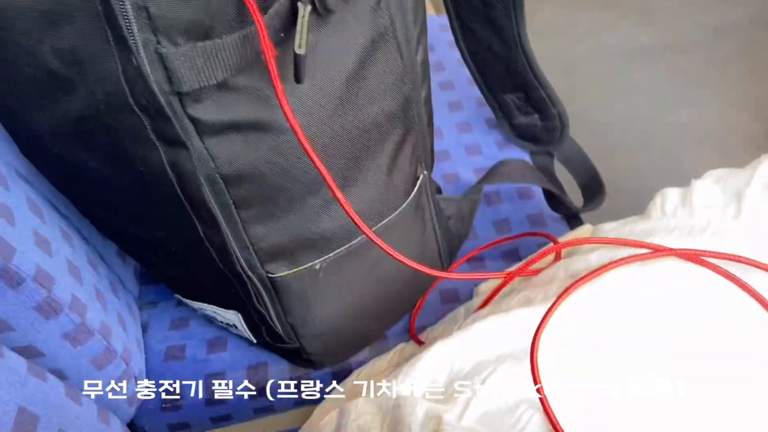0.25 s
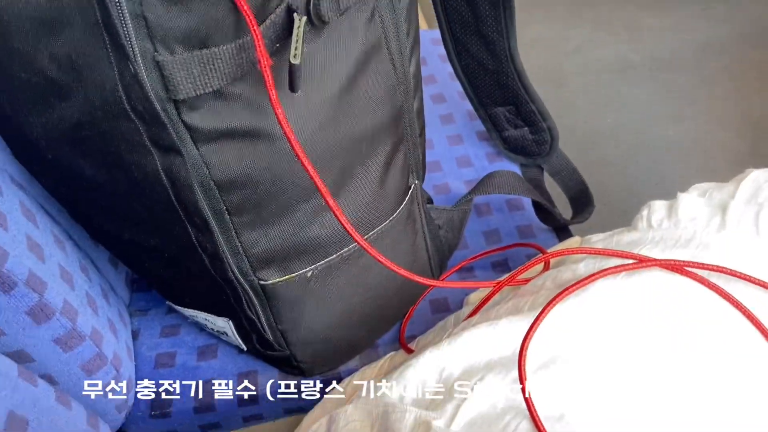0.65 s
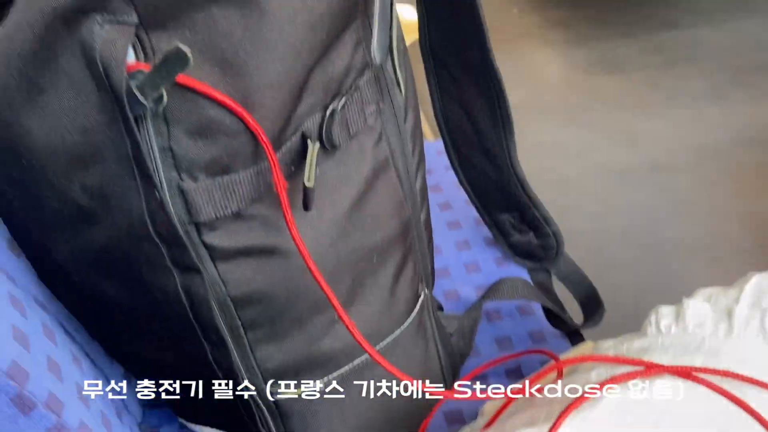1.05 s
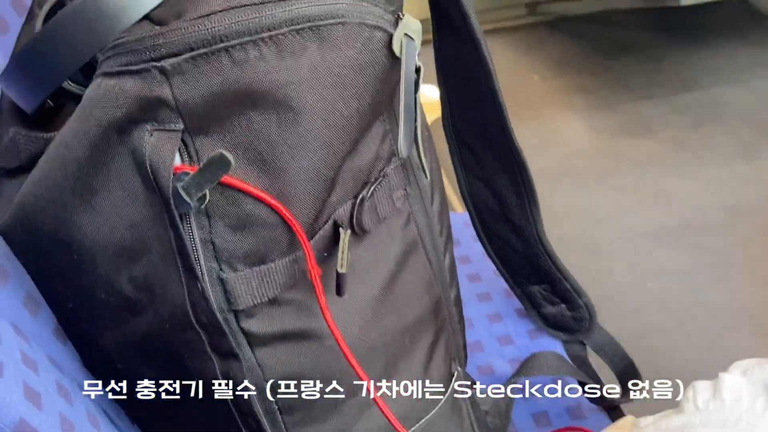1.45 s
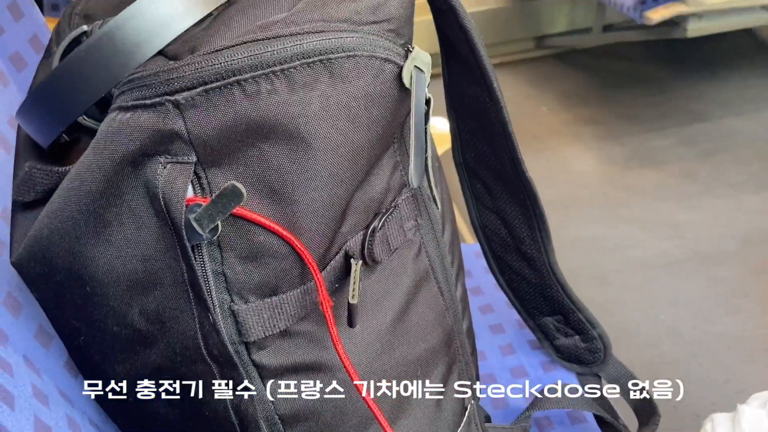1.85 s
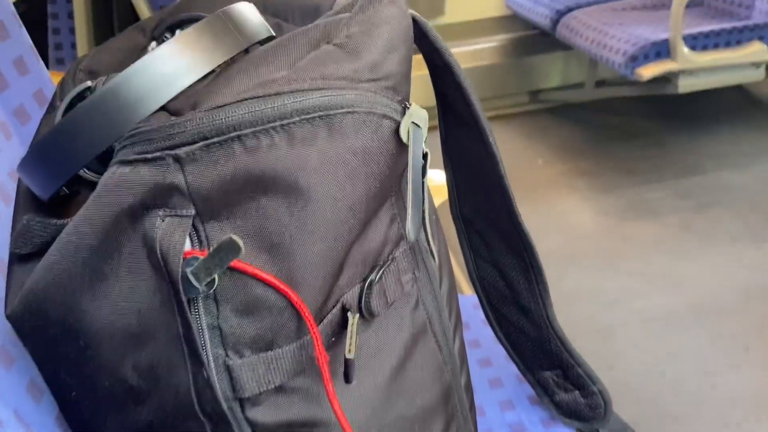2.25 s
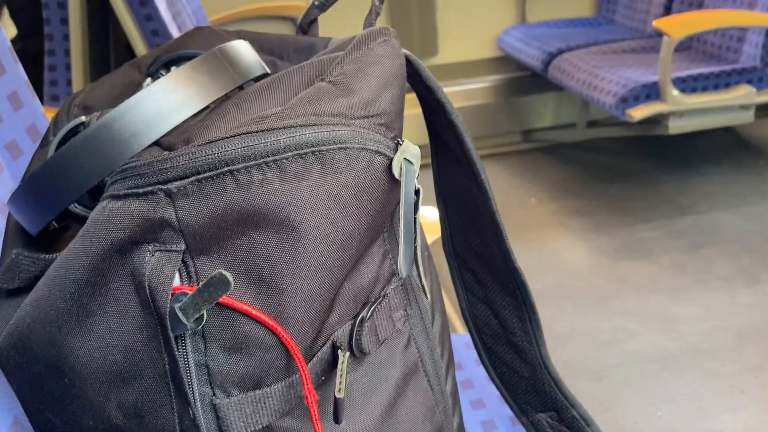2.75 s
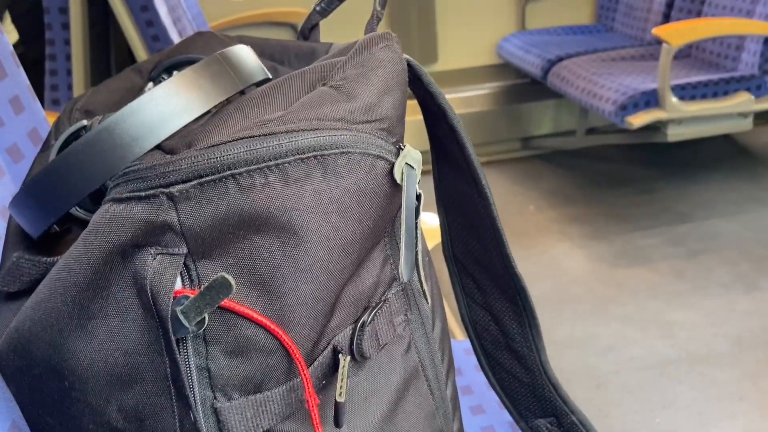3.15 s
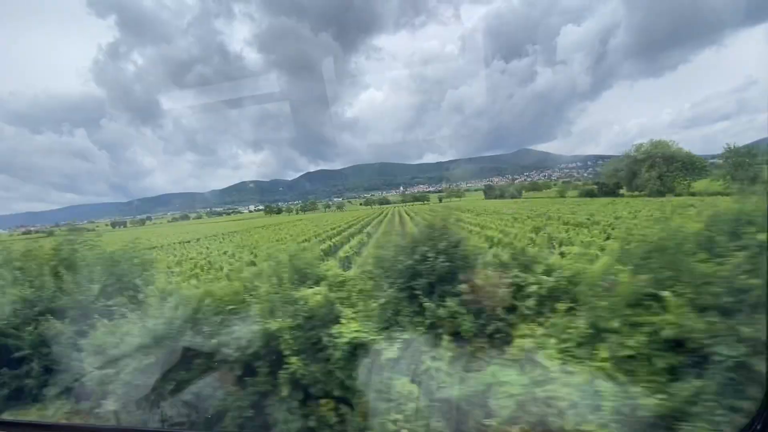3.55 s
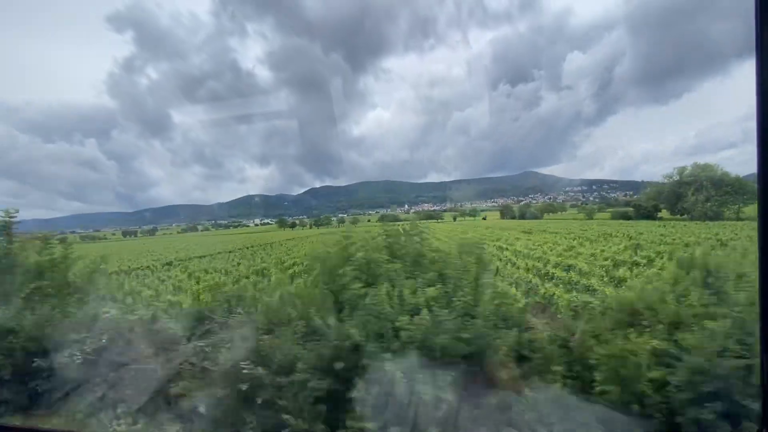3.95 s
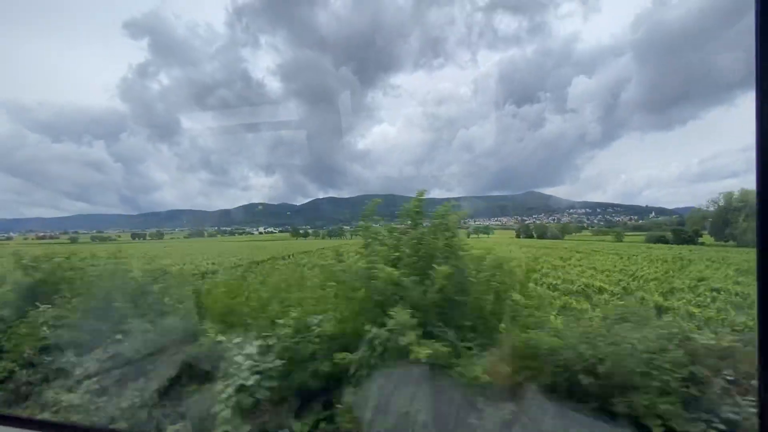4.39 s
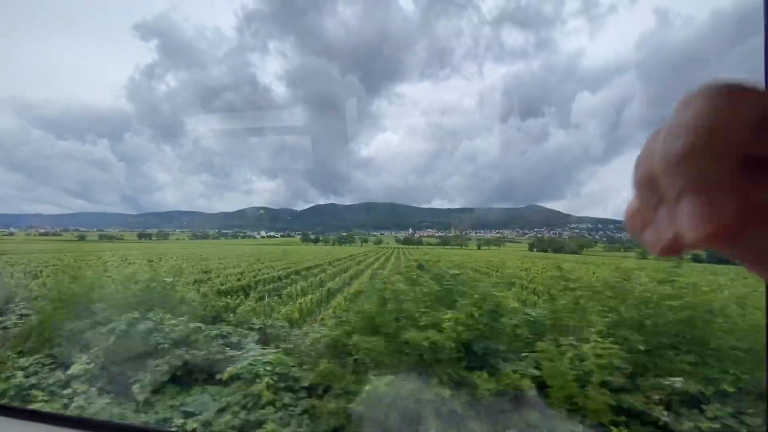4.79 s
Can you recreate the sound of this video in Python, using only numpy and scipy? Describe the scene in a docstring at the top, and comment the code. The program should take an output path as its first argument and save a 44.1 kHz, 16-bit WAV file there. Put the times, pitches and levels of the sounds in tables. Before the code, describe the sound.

Inside a diesel train carriage, the engine throbs at idle under the floor while a fan hums and the wheels roll with a low rumble. Soft knocks and swishes come as the wheels cross rough spots, followed by faint squeaks. About two thirds through, a click marks an abrupt change to a louder, pulsing engine boom with slightly rising gear tones and heavier rolling noise. The microphone is in the passenger cabin.

```python
"""A diesel engine throbs at idle under the floor of a coasting railcar, three firings to each turn.
A fan hums, and broadband rolling noise swells as the wheels cross rough spots, with soft knocks,
swishes and faint squeaks. A click marks an abrupt jump to a window seat with the engine pulling:
a strong firing boom that beats with nearby tones, gear tones rising with speed, louder rolling noise."""
import sys
import numpy as np
from scipy import signal
from scipy.fft import rfft, irfft, next_fast_len
from scipy.io import wavfile
from scipy.ndimage import uniform_filter1d, map_coordinates

SR = 44100
rng = np.random.default_rng(int(sys.argv[2]) if len(sys.argv) > 2 else 0)


def wrap_up_sound(samples):
    """Save the sound to the file named by the first command line argument, as 16-bit audio."""
    columns = np.atleast_2d(samples).T
    # keep every value between -1 and 1, then stretch to whole-number steps
    tamed = np.clip(columns, -1, 1)
    steps = np.round(tamed * 32767).astype(np.int16)
    wavfile.write(sys.argv[1], SR, steps)


N = 221602
T = np.arange(N) / SR
JUMP_S, FIRINGS_PER_TURN = 3.53717, 3


def amp(db):
    """The decibel law: 20 dB is a factor of ten in amplitude."""
    return 10 ** (np.asarray(db) / 20)


def along(points, hz):
    """Interpolation of (Hz, value) points on a logarithmic frequency axis."""
    f, v = np.transpose(points)
    return np.interp(np.log(hz + 1), np.log(f + 1), v)


def curves(rows):
    """Linear interpolation in time: one value per sample for each column after the first."""
    s, *cols = np.transpose(rows)
    return [np.interp(T, s, c) for c in cols]


def wobble(rate):
    """Smooth random modulation: a spline through rate knots a second."""
    return map_coordinates(rng.standard_normal(int(N * rate / SR) + 4), [T * rate])


def swell(s, rise, fall):
    """A Gaussian envelope that peaks at time s, with separate rise and fall times."""
    return np.exp(-np.where(T < s, ((s - T) / rise) ** 2, ((T - s) / fall) ** 2))


def filtered(x, response):
    """Linear filtering: the spectrum of x is multiplied by a frequency response."""
    m = next_fast_len(N + SR // 2)
    return irfft(rfft(x, m) * response(np.fft.rfftfreq(m, 1 / SR)), m)[..., :N]


def tone(cycles, mid_db, side_db):
    """A wave reaches one channel first, so the side (difference) lags the mid (sum) a quarter cycle."""
    mid = amp(mid_db) * np.cos(2 * np.pi * cycles)
    side = amp(side_db) * np.sin(2 * np.pi * cycles)
    return np.sqrt(2) * np.array([mid + side, mid - side])


def orders(turns, table, waver_db, locked):
    """Superposed multiples of a shaft's speed; phase-locked ones add up to one pulse per firing."""
    return sum(amp(waver_db * wobble(2.99)) * tone(k * turns + (0 if locked else rng.random()), mid, side)
               for k, mid, side in table)


def idling_engine(turns):
    """Periodic firing gives a harmonic series; uneven firing adds tones between the harmonics."""
    # Each row: time in seconds, mid level of the firing fundamental in dB.
    throb_levels = [(0, -28), (1.2, -29.5), (1.6, -34), (2.4, -35), (3.6, -35)]
    # Each row: multiple of crank speed, mid level in dB, side level in dB.
    firing_orders = [(6, -33.5, -75), (9, -42, -75), (12, -47, -75), (18, -46, -62)]
    knock_orders = [(24, -63, -69), (27, -58, -59), (30, -60, -64), (33, -56.5, -56), (36, -68, -57),
                    (39, -63.5, -60), (42, -57, -63), (45, -62, -66), (48, -73, -62), (51, -61.5, -61)]
    uneven_orders = [(4.5, -41, -80), (5, -37.5, -80), (7, -48, -80), (8, -39, -72), (14, -48, -78)]
    throb_db, = curves(throb_levels)
    throb = tone(FIRINGS_PER_TURN * turns - 1 / 3, throb_db, throb_db - 45)  # trails the push
    push = orders(turns, firing_orders, waver_db=1.5, locked=True)
    knock = orders(turns, knock_orders, waver_db=2.5, locked=True)
    uneven = orders(turns, uneven_orders, waver_db=3.0, locked=False)
    return throb + push - knock + uneven  # the diesel knock pulls where the low harmonics push


def fan():
    """A fan hums at one frequency; its phase is the integral of that slowly drifting frequency."""
    # Each row: time in seconds, frequency in Hz, mid level in dB.
    hum = [(0, 212.4, -39.5), (1.8, 212.4, -38.5), (2.2, 213, -37.5), (3.6, 212.9, -37.5)]
    hz, db = curves(hum)
    return tone(np.cumsum(hz) / SR, db, db - 19.5)


def cabin_noise(mids, sides, width_db, late, lean, levels, patchy_db):
    """Partly coherent noise shaped in four registers: rolling rumble, floor drone, rail roar, high hiss."""
    out = 0
    for mid, side, side_db, share, level_db in zip(mids, sides, width_db, late, levels):
        z = signal.stft(rng.standard_normal((2, N)), nperseg=2048)[2]
        # A share of the side signal is the mid signal arriving a quarter cycle late.
        z[1] = np.sqrt(1 - share ** 2) * z[1] - 1j * share * z[0]
        patches = rng.standard_normal(z.shape[1:])  # level varies over frequency and time
        patches = uniform_filter1d(uniform_filter1d(patches, 4, 0), 4, 1)
        pair = signal.istft(z * amp(patchy_db * patches / patches.std()), nperseg=2048)[1][:, :N]
        pair = filtered(pair, lambda hz: amp([along(mid, hz), along(side, hz)]))
        out = out + amp(level_db) * amp([[0], [side_db]]) * pair / pair.std(axis=1, keepdims=True)
    stereo = np.array([out[0] + out[1], out[0] - out[1]])
    return filtered(stereo, lambda hz: amp([along(lean, hz) / 2, -along(lean, hz) / 2]))


def coasting_noise(turns):
    """Amplitude modulation of the noise: each firing rattles the upper registers, and jolts lift it."""
    # Each row: frequency in Hz, relative spectral level in dB; sides holds one such table per register.
    rumble = [(16, -26), (30, -9), (44, -7), (55, -3), (70, -2), (85, -5), (110, -4), (135, -11),
              (185, -10), (205, -14), (230, -15), (260, -19), (340, -45), (570, -120)]
    drone = [(150, -30.5), (260, -4), (285, 1.5), (431, -6.5), (484, -11), (700, -12), (745, -24.5),
             (980, -54), (1650, -120)]
    roar = [(440, -26), (750, -1.5), (892, -2.5), (1050, -4.5), (1430, -3), (1630, -6), (2030, -5.5),
            (2230, -10), (2540, -9.5), (3300, -16.5), (4290, -45), (7260, -120)]
    # High hiss with narrow gaps near 7.2 kHz (mid) and 10.5 kHz (last side table), as in compressed audio.
    gapped_hiss = [(1940, -37), (3300, -5), (3800, -0.5), (4590, -2), (6230, -12.5), (6960, -24.5),
                   (7240, -54), (8130, -19), (9200, -13), (11800, -15), (13600, -44), (14600, -24),
                   (15600, -32)]
    sides = [
        [(16, -44), (28, -18), (177, -9), (206, 5), (260, -4), (340, -31), (570, -120)],
        [(150, -34.5), (260, -7), (471, -1), (750, -10), (980, -34.5), (1650, -120)],
        [(440, -26), (750, 2.5), (887, -6), (1020, -5.5), (1490, -7), (3300, -15.5), (4290, -44), (7260, -120)],
        [(1940, -29.5), (3300, 0.5), (4650, -3.5), (8730, -12.5), (9820, -24), (10500, -45), (10700, -26),
         (11500, -18), (14100, -15), (15600, -32)],
    ]
    # Each row: frequency in Hz, left minus right level in dB.
    lean = [(100, 0), (200, 1), (380, 3.5), (700, 1), (2400, 0)]
    # The noise brightens and stays so. Each row: time in seconds, lift of the hiss in dB.
    brightening = [(0, 1.5), (.9, -0.5), (1.3, 3.5), (1.65, 6.5), (1.9, 7), (2.25, 8.5), (2.6, 6.5),
                   (3.1, 5.5), (3.5, 6.5)]
    steady_db = np.c_[[-31, -44.5, -56.5, -69]] + np.outer([0.28, 0.02, 0.44, 1], curves(brightening)[0])
    rattle_db = np.outer([0, 1.3, .7, .6], np.cos(2 * np.pi * FIRINGS_PER_TURN * turns))
    drift_db = 0.27 * np.array([wobble(4.2) for _ in range(4)])
    levels = steady_db + rustles() + jolts() + rattle_db + drift_db
    return cabin_noise((rumble, drone, roar, gapped_hiss), sides, width_db=(-33, -1.5, 7, 0.5),
                       late=(0.37, 0.34, .4, .55), lean=lean, levels=levels, patchy_db=2.5)


def rustles():
    """Soft friction, as of cloth, is mostly hiss: a lift in dB for each register."""
    # Each row: peak time in seconds, lift of the hiss in dB.
    rubs = [(.24, 1), (.95, 4), (1.09, 1.5), (1.5, 4.5), (3.2, 2), (3.4, 2)]
    return np.outer([0.1, 0, 0.038, 0.93], sum(db * swell(s, rise=0.036, fall=0.14) for s, db in rubs))


def jolts():
    """Rough spots excite the wheels briefly over a broad band: a lift in dB for each register."""
    # Each row: peak time in seconds, fall time in seconds, lift of the hiss in dB.
    rough_spots = [(1.045, 0.075, 7), (1.543, 0.06, 5.5), (2.04, 0.038, 1), (2.72, 0.041, 3.5)]
    return np.outer([0.49, 0.72, 0.8, 1], sum(db * swell(s, 0.0077, fall) for s, fall, db in rough_spots))


def swishes():
    """Noise bursts each excite one resonance, mostly on the two strongest jolts."""
    # Each row: peak time, rise and fall in seconds, centre and half-width in Hz, level in dB.
    bursts = [(1.065, 0.026, 0.02, 550, 150, -44), (1.05, .012, 0.027, 1670, 340, -52),
              (1.085, 0.015, 0.033, 250, 64, -40.5), (1.065, .015, .025, 930, 100, -51),
              (1.541, .002, .04, 4470, 450, -49), (1.548, .004, .025, 5500, 760, -54),
              (1.577, 0.036, 0.096, 4670, 1000, -55), (1.546, .004, .055, 10300, 1200, -58.5),
              (1.565, 0.013, .02, 200, 45, -27.5), (1.548, .008, 0.032, 600, 220, -45),
              (1.548, 0.0055, 0.029, 1820, 220, -50), (1.545, .005, .035, 1050, 140, -48),
              (1.598, 0.0095, 0.016, 200, 59, -28.5), (1.602, .008, 0.012, 620, 180, -46),
              (1.603, .01, .015, 1340, 510, -51), (1.632, .012, 0.013, 800, 390, -50.5),
              (3.8, .012, 0.026, 570, 45, -46), (3.195, .015, .03, 10500, 1600, -72),
              (3.36, .04, .06, 4300, 710, -66)]
    out = 0
    for s, rise, fall, hz, half_width, db in bursts:
        band = signal.butter(3, [hz - half_width, hz + half_width], "band", fs=SR, output="sos")
        mid, side = signal.sosfilt(band, rng.standard_normal((2, N)))
        stereo = np.array([mid + 0.44 * side, mid - 0.28 * side]) / mid.std()
        out = out + amp(db) * swell(s, rise, fall) * stereo
    return out


def thuds(rise_s=.001):
    """Damped oscillation: knocks inside the two strongest jolts die within a few cycles."""
    # Each row: start in seconds, frequency in Hz, decay time in seconds, level in dB.
    knocks = [(1.046, 330, .008, -27), (1.069, 260, .01, -24), (1.086, 150, .012, -21),
              (1.539, 110, .008, -19), (1.5902, 80, .014, -12), (1.598, 600, .008, -31)]
    out = 0
    for s, hz, decay, db in knocks:
        t = np.clip(T - s, 0, None)
        envelope = np.exp(-t / decay) * (1 - np.exp(-t / rise_s))
        out = out + amp(db) * envelope * np.sin(2 * np.pi * hz * t)
    return out


def squeaks():
    """Linear chirps: faint tones glide in pitch and waver in level while they swell and fade."""
    # Each row: peak time, rise and fall in seconds, frequency in Hz, glide in Hz per second, level in dB.
    chirps = [(2.045, .025, .075, 1440, 100, -59), (2.135, .02, .03, 1550, 100, -59),
              (2.163, .02, .025, 1220, 200, -58), (3.25, .05, .06, 3580, 400, -73),
              (3.385, .03, .03, 3520, -900, -69), (3.44, .02, .03, 3510, 600, -70),
              (3.51, .05, .05, 3580, 500, -70.5)]
    waver = .95 + .3 * np.array([wobble(40), wobble(41)])
    return waver * sum(swell(s, rise, fall) * tone(hz * (T - s) + glide * (T - s) ** 2 / 2, db, -120)
                       for s, rise, fall, hz, glide, db in chirps)


def coasting():
    """Superposition of the sources in the coasting car; the idling crank times throb and rattle."""
    # Each row: time in seconds, crank speed in turns per second.
    crank_speed = [(0, 13.345), (1.9, 13.339), (2.2, 13.36), (3.6, 13.362)]
    turns = -.088 + np.cumsum(curves(crank_speed)[0]) / SR
    return idling_engine(turns) + fan() + coasting_noise(turns) + swishes() + thuds() + squeaks()


def click(length_s=.003):
    """A sudden step has a broad spectrum and is heard as a click, here stronger on the right."""
    step = (T >= JUMP_S) * np.clip(1 - (T - JUMP_S) / length_s, 0, 1)
    return np.outer([.08, .14], step)


def firing_boom(turns, lean_db=-0.8):
    """Beating: weaker tones beside the loaded firing tone make it dip about once an engine cycle."""
    # The deepest dips. Each row: time in seconds, gain of the firing tone in dB.
    dips = [(3.636, -9), (3.825, -6), (3.922, -4.5), (4.092, -4), (4.3, -4), (4.449, -6.5), (4.618, -6),
            (4.805, -9), (4.864, -10.5)]
    # Each row: multiple of crank speed, phase lead in cycles, mid level in dB, side level in dB.
    beat_tones = [(2, -.17, -34.5, -62), (2.5, -.36, -30.5, -51.5), (2.585, -.42, -29.5, -54),
                  (4, -.1, -38, -60)]
    dip_db = sum(db * swell(s, rise=0.01, fall=0.01) for s, db in dips)
    boom = amp(dip_db) * tone(FIRINGS_PER_TURN * turns, mid_db=-14.5, side_db=-42)
    neighbours = sum(amp(.7 * wobble(2.2)) * tone(k * turns + lead, mid, side)
                     for k, lead, mid, side in beat_tones)
    return (boom + neighbours) * amp([[lean_db / 2], [-lean_db / 2]])


def shaft_tones(turns, table, waver_db, jitter_cycles):
    """Modulated shaft orders: each swells or fades steadily and wanders in level and phase."""
    return sum(amp(growth * (T - 4.0) + waver_db * wobble(16))
               * tone(k * turns + rng.random() + jitter_cycles * wobble(12), mid, side)
               for k, mid, side, growth in table)


def engine_and_gears(turns):
    """Fixed gear ratios make the tones of two shafts rise in pitch with those of the loaded engine."""
    # Each row: multiple of shaft speed, mid and side levels in dB at 4 s, growth in dB per second.
    engine_orders = [(5.89, -43, -39.5, -2.5), (21.46, -65.5, -66, -0.5), (30.2, -59, -58.5, -10)]
    drive_orders = [(2, -38, -57, -1.5), (4, -36.5, -48.5, -1.5), (5, -39.5, -45.5, 5),
                    (6, -51, -46.5, -1.5), (7, -50.5, -63.5, 4.5), (8, -43.5, -62, -2.5)]
    pump_orders = [(2, -45.5, -55.5, 3.5), (3, -46, -46, 5.5), (6, -50, -52, 5.5), (8, -59, -53.5, -4.5)]
    # Each row: multiple of crank speed, mid level in dB, side level in dB.
    uneven_orders = [(4.5, -35.5, -56), (7, -44, -51), (16.5, -62, -52), (20, -66, -58), (22, -67, -57)]
    drive_ratio, pump_ratio = 1.783, 3.058
    engine = shaft_tones(turns, engine_orders, waver_db=2.3, jitter_cycles=0.02)
    uneven = orders(turns, uneven_orders, waver_db=1.0, locked=False)
    drive = shaft_tones(drive_ratio * turns, drive_orders, waver_db=3.0, jitter_cycles=0.07)
    pump = shaft_tones(pump_ratio * turns, pump_orders, waver_db=3.2, jitter_cycles=.1)
    return engine + uneven + drive + pump


def pulling_noise():
    """Rolling noise grows with speed: each register rises steadily in level."""
    # Each row: frequency in Hz, relative spectral level in dB; sides holds one such table per register.
    rumble = [(16, -28), (32, -4), (43, -12), (62, 1), (100, -3.5), (150, -7), (210, -13), (260, -16),
              (340, -45), (570, -120)]
    drone = [(150, -27.5), (260, -6), (290, -2), (377, -2), (497, -7.5), (557, -14), (750, -15.5),
             (980, -47.5), (1650, -120)]
    roar = [(440, -27), (750, 1), (818, -3.5), (881, -5), (1500, -9.5), (2030, -15.5), (2810, -17),
            (3300, -22.5), (4290, -51.5), (7260, -120)]
    hiss = [(1940, -29), (3300, -5.5), (3930, -3.5), (8460, -12), (9560, -13.5), (10600, -9.5),
            (12400, -20), (13100, -45), (14200, -25.5), (15600, -33)]
    sides = [
        [(16, -40), (28, -9.5), (70, 3), (119, -2.5), (168, -2), (260, -5), (340, -34.5), (570, -120)],
        [(150, -29), (260, 0.5), (335, -3.5), (750, -11.5), (980, -39.5), (1650, -120)],
        [(440, -31.5), (750, -5), (818, -8), (887, -13.5), (1530, -18.5), (3300, -29.5), (4290, -63.5),
         (7260, -120)],
        [(1940, -36), (3300, -1), (4650, -3), (10100, -10), (11500, -23.5), (12500, -17.5), (14000, -18.5),
         (15600, -46)],
    ]
    # Each row: frequency in Hz, left minus right level in dB.
    lean = [(60, -.5), (110, -.5), (200, -4), (380, -1.5), (700, 2), (4400, 3.5), (8100, 1), (15000, 0)]
    rise_db = np.outer([0.066, 1, .4, .9], T - 4.3)
    drift_db = 0.41 * np.array([wobble(5.4) for _ in range(4)])
    levels = np.c_[[-27, -39, -49, -65]] + rise_db + drift_db
    return cabin_noise((rumble, drone, roar, hiss), sides, width_db=(-17, -0.5, 2, -0.5),
                       late=(0.44, 0.51, .4, .4), lean=lean, levels=levels, patchy_db=1.93)


def pulling():
    """Superposition of the sources under load, with the crank at about twice its idling speed."""
    # Each row: time in seconds, crank speed in turns per second.
    crank_speed = [(3.537, 26.496), (5.03, 27.1)]
    turns = np.cumsum(curves(crank_speed)[0]) / SR
    turns = -.058 + turns - turns[round(JUMP_S * SR)]  # crank angle counted from the jump
    return firing_boom(turns) + engine_and_gears(turns) + pulling_noise()


def scene(fade_s=.0045):
    """A crossfade of a few milliseconds around the click leads from coasting to pulling."""
    later = np.clip(1 / 3 + (T - JUMP_S) / fade_s, 0, 1)
    return (1 - later) * coasting() + later * pulling() + click()


def record(dry, bass_hz=28, top_hz=15700):
    """Band limiting: the deepest bass rolls off and nothing passes above the top frequency."""
    return filtered(dry, lambda hz: (hz < top_hz) / (1 + (bass_hz / (hz + 1)) ** 6))


dry = scene()
out = record(dry)
wrap_up_sound(out)
```